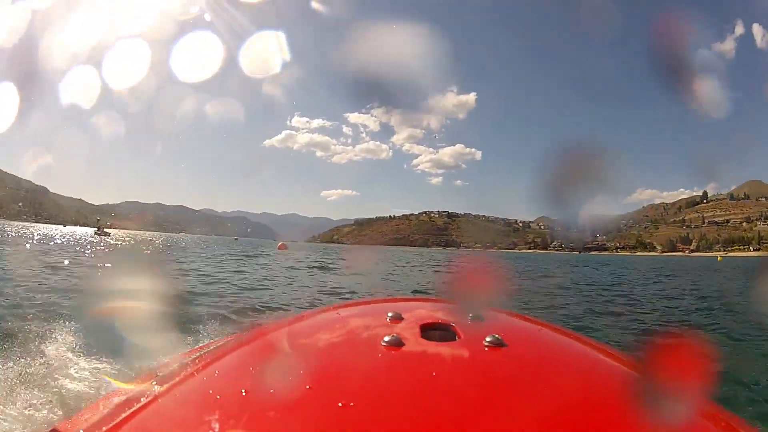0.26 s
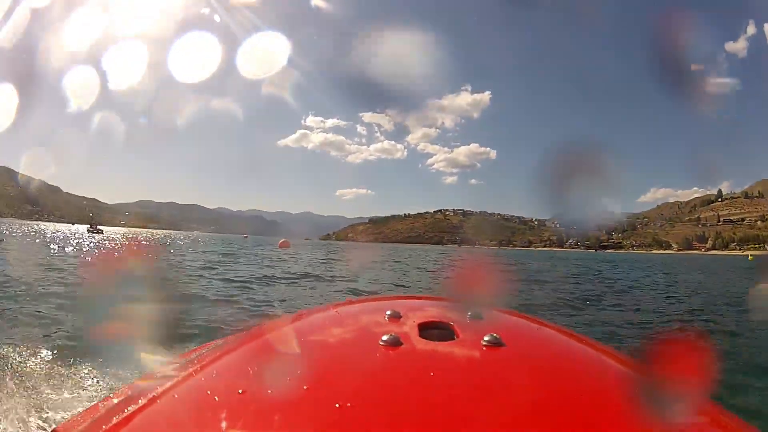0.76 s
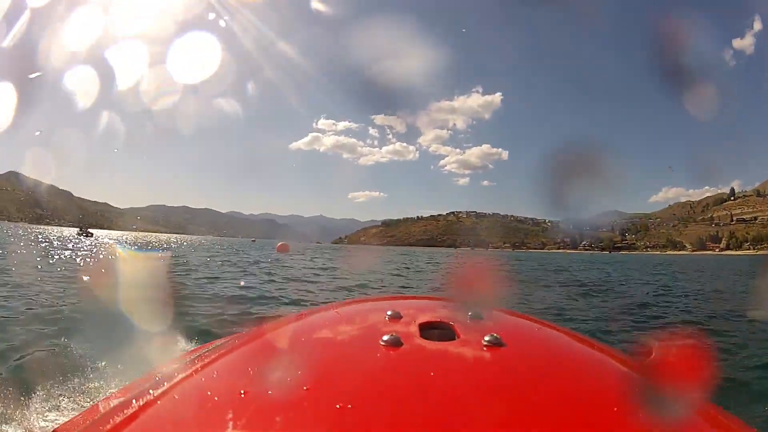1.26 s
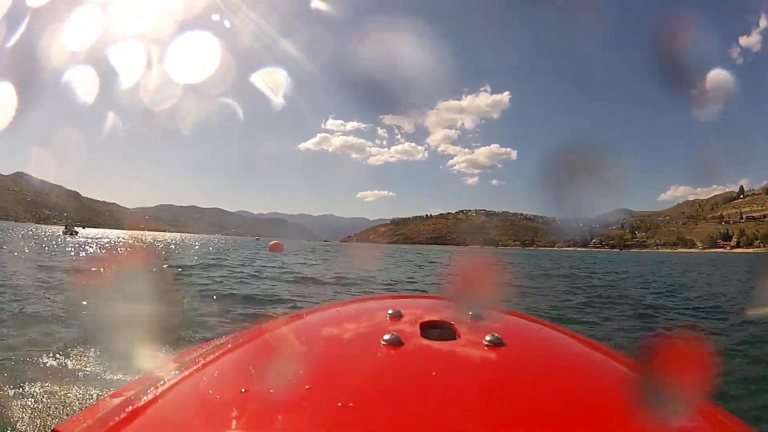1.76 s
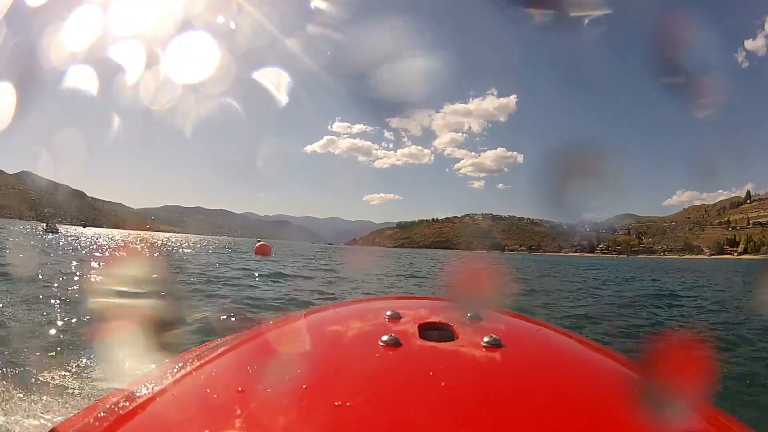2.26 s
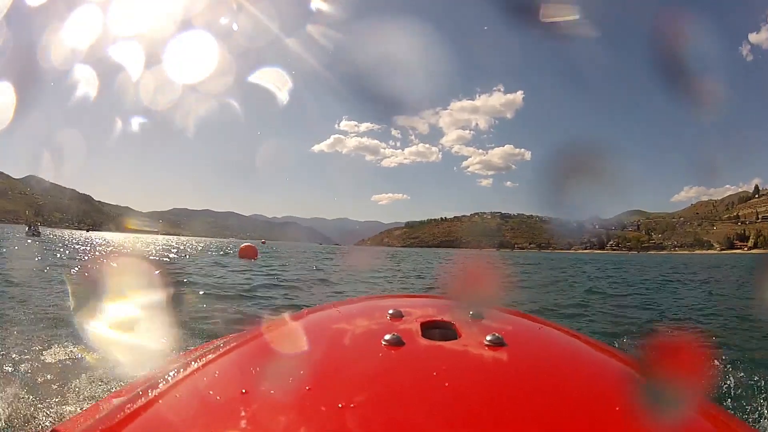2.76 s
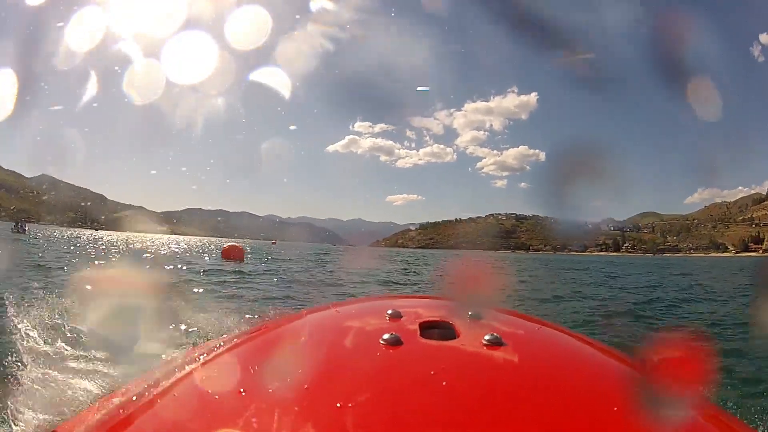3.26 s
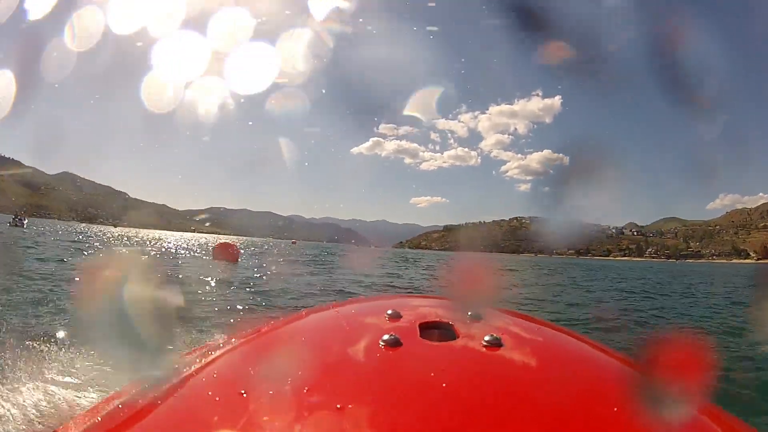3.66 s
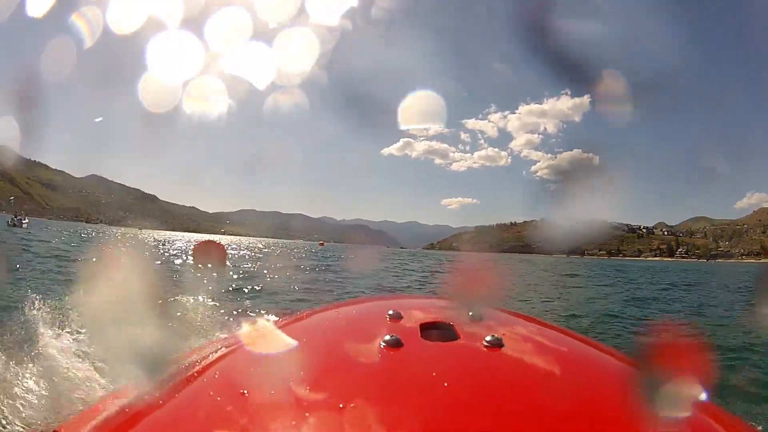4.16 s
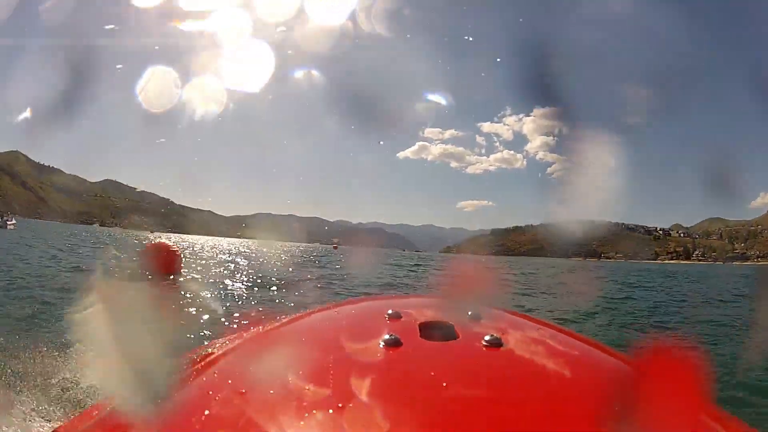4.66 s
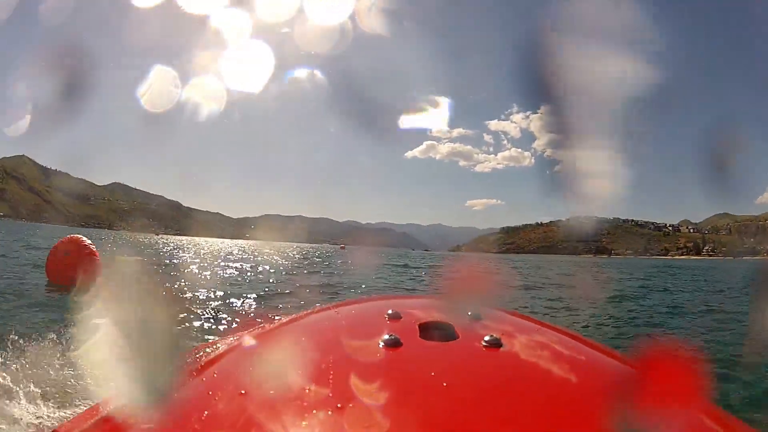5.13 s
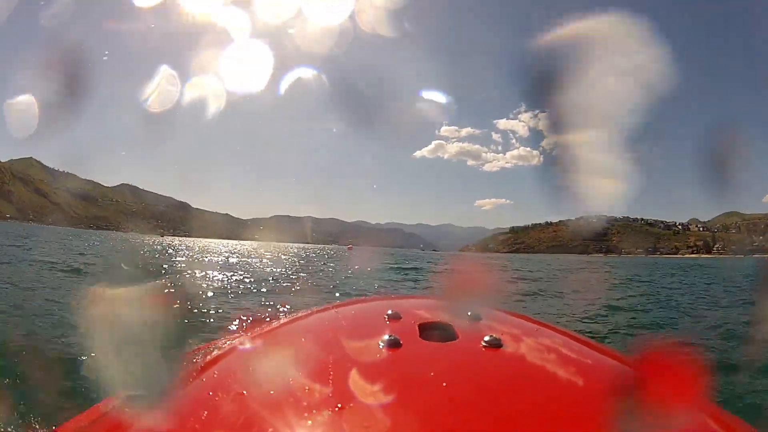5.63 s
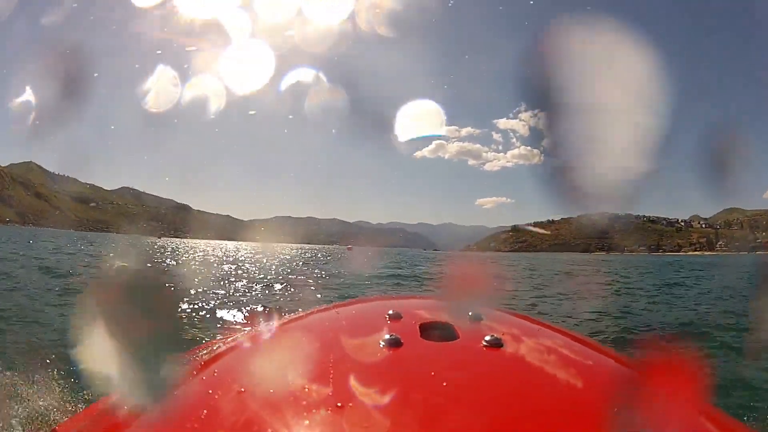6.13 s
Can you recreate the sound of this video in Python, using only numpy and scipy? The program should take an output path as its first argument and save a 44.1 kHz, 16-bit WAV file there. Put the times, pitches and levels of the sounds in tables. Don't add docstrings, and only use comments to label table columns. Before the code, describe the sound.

A small racing boat runs at speed over short waves, heard from inside a sealed plastic case bolted to its deck. Right away a low engine drone, around 70 to 80 turns a second, comes through the hull, with heavy slaps near 0.1 and 0.2 s and a hard knock at 0.25 s. Drops patter around 0.3 to 0.6 s. Thereafter waves thud several times a second while the case buzzes, chatters and clacks irregularly, a short hollow ring near 2 kHz. The engine flares briefly at 1.4 s and dips in strength as the propeller skips, notably at 2.4 s. Strong knocks stand out at 3.4 and 4.8 s. From 4 s the pitch sits higher; spray surges at 5.65 s as the engine races, eases near 6.1 s, then climbs again to the abrupt end at about 6.4 s. Everything is mono, close, gritty and clipped, the level pumping after blows.

```python
import sys
import numpy as np
from scipy import signal
from scipy.fft import rfft, irfft
from scipy.io import wavfile
from scipy.ndimage import uniform_filter1d

SR = 44100
rng = np.random.default_rng(int(sys.argv[2]) if len(sys.argv) > 2 else 0)


def gain_from_db(level_db):
    decades = np.asarray(level_db, float) / 20
    return 10 ** decades


def dump(signal):
    limited = np.clip(np.atleast_2d(signal).T, -1, 1)
    pcm = np.round(limited * 32767).astype(np.int16)
    wavfile.write(sys.argv[1], SR, pcm)


N = 281799

# (time [s], spray level [dB])
WETNESS = [(0, -41.5), (.3, -54.5), (.5, -49.5), (.62, -44.5), (1.4, -45), (2.2, -45), (3.8, -45.5),
           (4.05, -36), (4.4, -49.5), (4.55, -37), (5.35, -39.5), (5.45, -37), (5.65, -25), (5.67, -33),
           (6.1, -33.5), (6.2, -32), (6.39, -26.5)]
# (time [s], peak level [dB])
DROPS = [(.0491, -12), (0.2419, -6), (.431, -11), (.527, -11), (0.7059, -11.5), (1.161, -11), (1.391, -12),
         (1.432, -8), (1.4922, -11), (1.8256, -15), (2.123, -16), (2.24, -14), (2.276, -11), (2.4298, -12),
         (2.696, -13), (3.4897, -14), (3.578, -12), (3.908, -13), (3.961, -13), (4.304, -16), (4.47, -13.5),
         (4.718, -14.5), (4.7648, -6), (4.9924, -16), (5.1141, -12), (5.1408, -11), (5.222, -8),
         (5.43, -11), (5.443, -7.5)]
SHOWER_FROM_S, SHOWER_TO_S, SHOWER_DB = 0.34, 0.63, -24
MIST_PER_S, MIST_DB, MIST_SPREAD_DB = 80, -43.5, 4.5

# (time [s], peak level [dB], start pitch [Hz], end pitch [Hz], length [s])
SLAPS = [
    (0.119, -2.5, 90.5, 79, 0.043),
    (.16, -5.5, 113.4, 246, 0.091),
    (.96, -8, 119.1, 217.5, 0.061),
    (1.7, -8, 169.8, 73.7, 0.108),
    (5.95, -24.5, 111.9, 168.2, 0.057),
]
# (crest time [s], blow on hull [dB], length [s], propeller bite [dB])
WAVES = [(0.155, 9, 0.23, 5), (0.465, 8.5, 0.17, 9.5), (0.737, 9.5, 0.21, 10), (.83, -4.5, 0.13, 2),
         (1.007, 3.5, 0.16, 3), (1.263, 2.5, 0.22, 6.5), (1.442, 11, 0.16, -8), (1.622, 3.5, 0.25, 7.5),
         (1.729, 6.5, 0.099, 1), (1.953, 5.5, 0.22, 10.5), (2.098, 4, 0.15, 7), (2.32, 9, 0.15, 6.5),
         (2.492, -2, 0.17, 0), (2.686, 8, .18, 13.5), (2.812, 9.5, 0.116, 1), (2.936, 8, 0.13, 9.5),
         (3.34, 10, 0.17, 11.5), (3.481, -1.5, 0.071, -3), (3.672, 6, 0.2, 11), (3.95, -1.5, 0.18, 0.5),
         (4.088, 8.5, 0.19, 12), (4.306, 1.5, .15, 3.5), (4.581, 7, 0.26, 10), (4.735, 5, 0.15, 6),
         (4.92, 3.5, 0.25, 7), (5.404, 4.5, 0.48, 5.5), (5.593, 11.5, 0.15, 6), (5.8, 1.5, 0.28, 2.5),
         (6.122, 5.5, .13, 7.5), (6.34, -0.5, 0.21, 5.5)]
# (frequency [Hz], level [dB per Hz])
HULL = [(12, -52), (20, -54), (38, -8.5), (67, -8), (85, -7.5), (125, -5), (232, -6), (454, -24),
        (595, -20), (792, -31.5), (900, -26), (1170, -32), (1980, -120)]

# (frequency [Hz], width [Hz], level [dB])
CASE = [
    (648, 880, -15),
    (953, 39, -6),
    (1181, 183, -1),
    (1476, 360, -5.5),
    (1850, 473, -0.5),
    (2274, 310, -3),
    (2570, 273, -1),
    (3492, 590, -15),
    (4930, 610, -20),
]
# (time [s], peak level [dB], ring [Hz], bright tick under peak [dB])
KNOCKS = [(0.2455, 5, 1600, -30), (0.5705, 1, 1940, -12), (0.7818, -4, 1890, -18), (0.89, -0.5, 1940, -21),
          (1.0256, -0.5, 2040, -28), (1.3016, -7, 2160, -20), (1.501, -3, 1690, -34),
          (1.5754, -2, 2027, -27), (1.7873, -5.5, 2280, -17), (1.9159, -2, 2080, -20.5),
          (2.0098, -2, 1910, -19.5), (2.148, -4, 1820, -30), (2.3445, -3, 1820, -35),
          (2.5396, -0.5, 1920, -11), (2.583, 1, 1872, -24), (2.7567, -1.5, 2030, -19),
          (3.1064, 0, 2020, -22), (3.2099, -1.5, 2400, -35), (3.4007, 2, 1970, -26), (3.472, -4, 1893, -23),
          (3.5071, -0.5, 1838, -18), (3.5853, -2, 1822, -12), (3.7661, -1.5, 1889, -18),
          (3.9449, -8, 1830, -29), (4.0957, -2.5, 2160, -32), (4.3499, -1.5, 1850, -34),
          (4.7891, 4, 1830, -11), (5.025, -5.5, 2400, -26.5), (5.65, 0, 1970, -30.5),
          (6.1755, -1.5, 1956, -31)]
# (time [s], peak level [dB], ring [Hz])
TAPS = [(0.0044, -7.5, 1930), (0.0483, -6, 2055), (0.4459, -2.5, 1850), (0.5192, -6, 1870),
        (0.7362, -2.5, 1580), (0.8773, -11, 2120), (1.077, -0.5, 1955), (1.1734, -7.5, 1935),
        (1.1913, -4.5, 1850), (1.257, -9, 2030), (1.6477, -6.5, 2100), (2.0691, -6.5, 1850),
        (2.2, -10, 1890), (2.4294, -9, 1880), (2.8308, -7, 2044), (2.9614, -5, 1789), (3.3134, -3, 1823),
        (3.342, -3.5, 1817), (3.8244, -8.5, 1880), (3.895, -4, 2213), (3.9594, -5, 2313),
        (4.0566, -2, 1859), (4.0801, 0.5, 1738), (4.3032, -4, 2025), (4.6279, -3.5, 2323),
        (4.7636, -2.5, 1826), (5.1556, -5.5, 2114), (5.223, -5, 2060), (5.2944, -0.5, 1910),
        (5.6376, -6, 1707)]
# (time [s], peak level [dB])
NUDGES = [(0.3401, -13), (0.6679, -5), (1.0962, -7.5), (1.699, -6.5), (2.046, -9), (2.1269, -2),
          (2.2393, -6), (2.3104, -3.5), (2.4536, -3.5), (2.7209, -8), (2.7303, -0.5), (2.9184, -10),
          (3.039, -5), (3.1749, -10), (3.576, -4.5), (3.6436, -7.5), (3.8704, -9), (4.0718, -1.5),
          (4.5086, -5), (4.569, -6.5), (4.7418, -4), (4.9799, -6.5), (5.3171, -2.5), (5.3457, -5.5),
          (5.731, -10.5), (5.7792, -2), (5.912, -10), (5.9413, -6), (6.124, -7.5), (6.2941, -6)]
CHATTER_PER_S, CHATTER_PER_S_PER_DB = 22, 5
CHATTER_DB, CHATTER_SPREAD_DB = -13, 2
CHATTER_HZ, CHATTER_SPREAD_HZ = 1940, 110

# (time [s], shaft speed [Hz], load level [dB])
ENGINE = [(0.0, 74.53, -16), (0.19, 79.15, -20), (0.28, 72.4, -14.5), (0.73, 70.1, -11),
          (1.01, 73.32, -12.5), (1.41, 94.33, -17), (1.73, 72.63, -12), (1.92, 73.38, -11.5),
          (2.46, 81.77, -13.5), (2.83, 72.4, -12.5), (3.92, 71.18, -11), (4.07, 81.81, -9.5),
          (4.77, 83.2, -13.5), (4.84, 88.5, -15), (5.3, 85.86, -14.5), (5.59, 111.9, -15.5),
          (6.1, 87.87, -18), (6.39, 107.9, -23)]
# (time [s], depth [dB], length [s])
SKIPS = [(.3, 2.5, 0.14), (1.37, 9, .1), (1.7, 9, 0.1), (2.42, 17, 0.11), (2.59, 3, 0.068),
         (2.78, 2, 0.077), (3.0, 1, 0.12), (4.15, 6, 0.23), (4.41, 8, 0.11), (4.8, -1.5, 0.11),
         (5.3, -6, 0.065), (5.49, 9.5, 0.11), (5.71, 10.5, .1), (5.89, 5, 0.1), (6.21, 5, 0.13)]
THIRD_DB, THIRD_DB_PER_HZ = -29, 0.09

POUND_DB, BUZZ_DB = -21.5, -28.5
FIRST_SHARE, POUND_SHARE, BUZZ_SHARE, SPRAY_SHARE = 0.31, 0.69, 0.58, 0.29
POUND_WET, BUZZ_WET = 0.25, 0.6

# (time [s], cut [dB], negative lifts the gain)
BITES = [(0.252, -11.5), (.576, 3), (.896, 2.5), (1.33, 0.5), (2.358, 3.5), (2.591, 4), (2.98, 1.5),
         (3.215, 2), (3.59, -2), (4.105, 1.5), (4.36, -0.5), (4.796, -1), (5.656, 0), (6.18, 1.5)]
STREAM_HZ, HOLD, EDGE_HZ = 12000, 4, 15420


def evened(x):
    return x / np.sqrt(np.mean(x ** 2) + 1e-20)


def curves(rows):
    s, *columns = np.transpose(rows)
    return [np.interp(np.arange(N) / SR, s, c) for c in columns]


def drift(hz):
    return evened(signal.lfilter(*signal.butter(2, hz, fs=SR), rng.standard_normal(N)))


def humps(rows):
    t = np.arange(N) / SR
    swells = [db * np.clip(1 - (2 * (t - s) / length) ** 2, 0, 1) ** 1.22 for s, db, length in rows]
    return np.max(swells, axis=0)


def case(x):
    out = 0
    for k, (hz, width, db) in enumerate(CASE):
        r = np.exp(-np.pi * width / SR)
        pole = r * np.exp(2j * np.pi * hz / SR)
        ring = signal.lfilter([(1 - r) ** 2], [1, -2 * pole, pole ** 2], x).real
        out = out + (-1) ** k * gain_from_db(db) * ring
    return out


def spray(level_db):
    t = np.arange(round(0.0024 * SR)) / SR
    shape = gain_from_db(level_db - 5 + 1.0 * drift(hz=141))
    when, size = rng.random(size=(20, 2)).T
    shower_s = SHOWER_FROM_S + (SHOWER_TO_S - SHOWER_FROM_S) * when
    shower = list(zip(shower_s, SHOWER_DB + 6 * (size - .5)))
    knock_ticks = [(s, db + tick_db) for s, db, _, tick_db in KNOCKS]
    for s, db in DROPS + shower + knock_ticks:
        shape[round(s * SR):][:len(t)] += gain_from_db(db - 7.0) * t / 0.0012 * np.exp(1 - t / 0.00092)
    mist_sizes = gain_from_db(MIST_DB + MIST_SPREAD_DB * np.minimum(rng.exponential(1, N), 4))
    mist = mist_sizes * (rng.random(N) < MIST_PER_S / SR)
    shape = shape + abs(signal.oaconvolve(mist, np.hanning(len(t)))[:N])
    bright = signal.butter(2, [3100, 5500], "band", fs=SR, output="sos")
    return shape * evened(signal.sosfilt(bright, rng.standard_normal(N)))


def slaps():
    out = np.zeros(N)
    for s, db, start_hz, end_hz, length in SLAPS:
        hz = np.geomspace(start_hz, end_hz, round(length * SR))
        thump = np.hanning(len(hz)) * np.sin(2 * np.pi * np.cumsum(hz) / SR)
        out[round(s * SR):][:len(hz)] += gain_from_db(db) * thump
    return out


def pounding(level_db):
    hz = np.fft.rfftfreq(N, 1 / SR)
    f, db = np.transpose(HULL)
    colour = gain_from_db(np.interp(np.log(hz + 1), np.log(f + 1), db, right=-100))
    lumps = gain_from_db(0.52 * drift(hz=38.6))
    rumble = irfft(rfft(rng.standard_normal(N)) * colour, N)
    return gain_from_db(level_db + 1.0) * evened(lumps * rumble)


def buzz(level_db, turns, spray_db):
    shake = 1 + .8 * np.cos(2 * np.pi * turns - .4)
    hits = rng.random(N) < 300 * shake / SR
    sizes = gain_from_db(6.5 * np.minimum(rng.exponential(1, N), 3.2)) * hits
    puff = signal.windows.hann(round(0.0023 * SR)) ** 2
    puffs = signal.oaconvolve(sizes, puff)[:N]
    wet_db = 0.38 * np.maximum(spray_db + 52.0, 0)
    rattle = evened(case(puffs * rng.standard_normal(N)))
    hiss = evened(case(gain_from_db(1.22 * drift(hz=147)) * rng.standard_normal(N)))
    return gain_from_db(level_db) * (gain_from_db(2 - wet_db) * rattle + gain_from_db(-2.0) * hiss)


def chatter(wave_db):
    slot_s = .0125
    slots = np.arange(0, N / SR - .03, slot_s)
    chance, place, size, tune = rng.random((len(slots), 4)).T
    s = slots + slot_s * place
    firm = np.array([row[0] for row in KNOCKS + TAPS + NUDGES])
    per_s = CHATTER_PER_S + CHATTER_PER_S_PER_DB * wave_db[(s * SR).astype(int)]
    clear = abs(s[:, None] - firm).min(axis=1) > .007
    keep = (chance < per_s * slot_s) & clear
    db = CHATTER_DB + 2 * CHATTER_SPREAD_DB * (size - .5)
    hz = CHATTER_HZ + 2 * CHATTER_SPREAD_HZ * (tune + place - 1)
    return np.transpose([s, db, hz])[keep].tolist()


def knocks(wave_db):
    t = np.arange(round(.012 * SR)) / SR
    hiss = evened(case(rng.standard_normal(N)))
    nudges = [(s, db, CHATTER_HZ) for s, db in NUDGES]
    rows = [row[:3] for row in KNOCKS] + TAPS + nudges + chatter(wave_db)
    draws = rng.random((600, 3))
    ring, scrape = np.zeros((2, N + len(t)))
    for (s, db, hz), (phase, span, beat) in zip(rows, draws):
        u = t / (0.0012 + 0.0019 * span)
        swell = gain_from_db(db) * 1.92 * u * np.exp(-u ** 3 / 2)
        other = 0.28 * np.cos(2 * np.pi * (hz * (1.14 + 0.24 * beat) * t + beat))
        at = slice(round(s * SR), round(s * SR) + len(t))
        ring[at] += swell * (np.cos(2 * np.pi * (hz * t + phase)) + other)
        scrape[at] += swell
    return gain_from_db(-4.5) * ring[:N] + gain_from_db(-9.0) * scrape[:N] * hiss


def engine(wave_db, bite_db):
    hz, load_db = curves(ENGINE)
    first_db = load_db - 0.5 + FIRST_SHARE * wave_db - humps(SKIPS)
    third_db = THIRD_DB + THIRD_DB_PER_HZ * (hz - 75) + bite_db
    turns = np.cumsum(hz * (1 + .012 * drift(hz=33.0))) / SR
    orders_db = [first_db, first_db - 16.0, third_db, third_db - 12.0]
    flutters_db = [1.9, 6.2, 1.54, 4.15]
    tones = np.zeros(N)
    for k, (db, flutter_db) in enumerate(zip(orders_db, flutters_db)):
        level = gain_from_db(db + flutter_db * drift(hz=39.3))
        tones += level * np.cos(2 * np.pi * (k + 1) * turns + 1.0 * k)
    return np.sqrt(2) * tones, turns


def scene():
    wave_db = humps([row[:3] for row in WAVES])
    wet_db, = curves(WETNESS)
    bite_db = humps([(s, bite, length) for s, _, length, bite in WAVES])
    tones, turns = engine(wave_db, bite_db)
    pounding_db = POUND_DB + POUND_SHARE * wave_db + POUND_WET * (wet_db + 43)
    buzz_db = BUZZ_DB + BUZZ_SHARE * wave_db + BUZZ_WET * (wet_db + 44.5)
    spray_db = wet_db + SPRAY_SHARE * wave_db
    shudder = drift(hz=67)
    water = pounding(pounding_db + 3.4 * shudder) + slaps() + spray(spray_db + 3.3 * shudder)
    loose_case = buzz(buzz_db + 2.0 * shudder, turns, spray_db) + knocks(wave_db)
    return (tones + water + loose_case)[None]


def low_pass(x):
    return signal.sosfilt(signal.butter(12, 16470, fs=SR, output="sos"), x)


def record(dry):
    t = np.arange(N) / SR
    peak_db = 20 * np.log10(abs(dry[0]) + 1e-6)
    fall = 50.6 * t
    over_db = np.maximum(np.maximum.accumulate(peak_db + fall) - fall + 3.0, 0)
    late_db = np.roll(uniform_filter1d(over_db, 130), 160)
    bite_db = np.zeros(N)
    for s, db in BITES:
        bite_db += db * np.clip((t - s) / 0.0066, 0, 1) * np.exp(-np.maximum(t - s, 0) / 0.081)
    ducked = dry[0] * gain_from_db(2.0 - 0.83 * late_db - bite_db)
    guard = signal.butter(6, 5600, fs=SR, output="sos")
    smooth = signal.sosfilt(guard, ducked)
    stream = np.clip(signal.resample_poly(smooth, STREAM_HZ // 300, SR // 300), -.975, .975)
    held = signal.resample_poly(np.repeat(stream, HOLD), SR // 300, HOLD * STREAM_HZ // 300)
    edge = signal.firwin(161, EDGE_HZ, window=("kaiser", 7), fs=SR)
    soft = signal.oaconvolve(held, edge, "same")[:N]
    return low_pass(soft[None])


dry = scene()
out = record(dry)
dump(out)
```